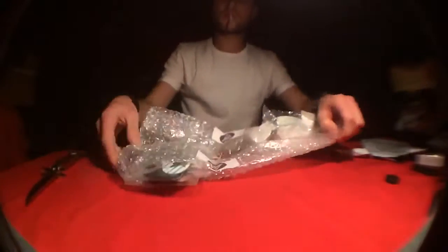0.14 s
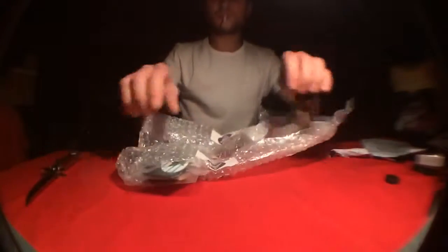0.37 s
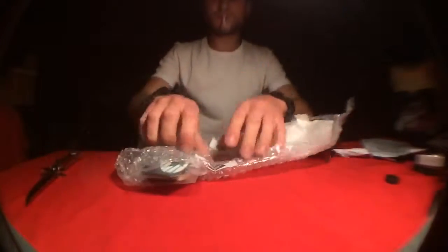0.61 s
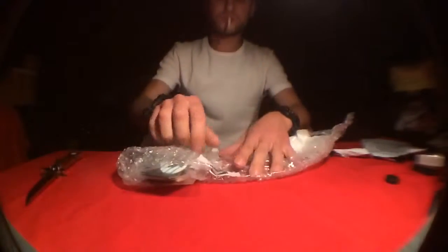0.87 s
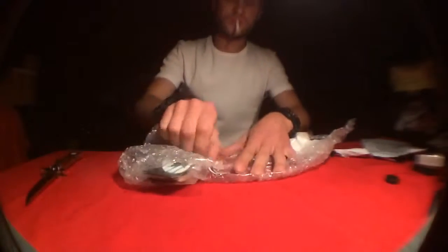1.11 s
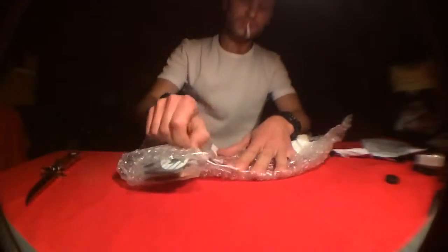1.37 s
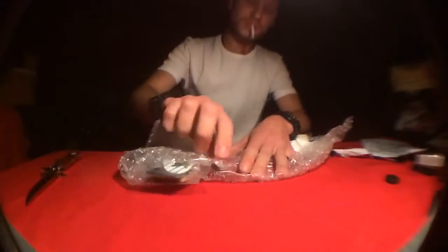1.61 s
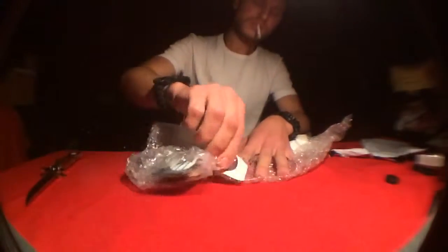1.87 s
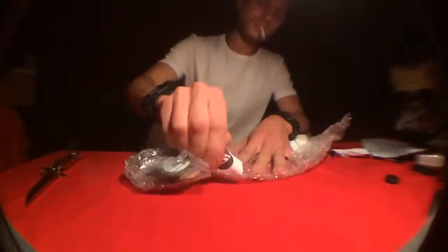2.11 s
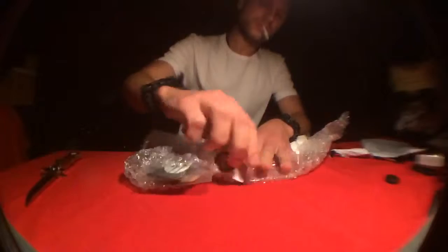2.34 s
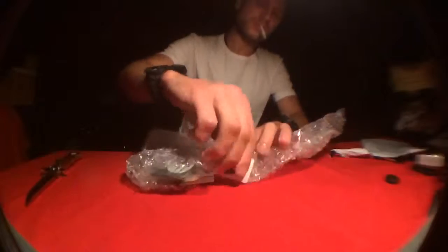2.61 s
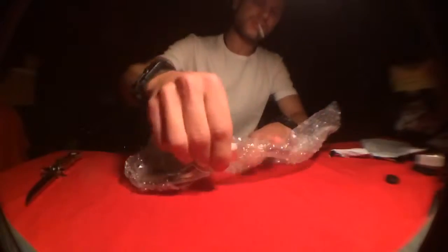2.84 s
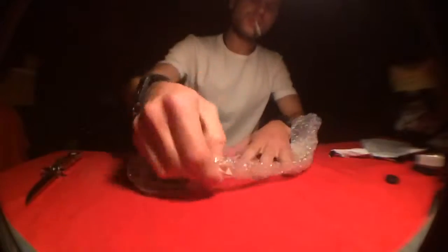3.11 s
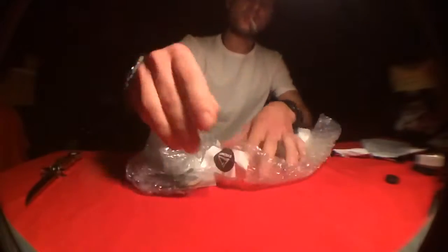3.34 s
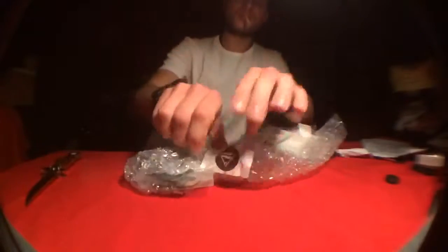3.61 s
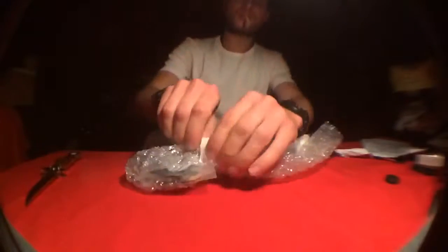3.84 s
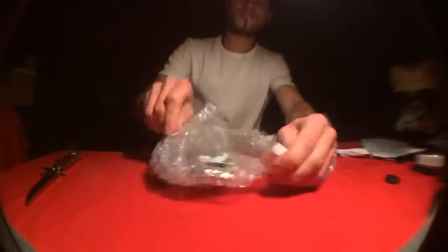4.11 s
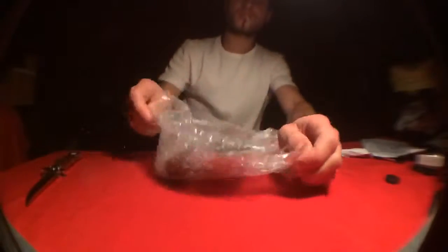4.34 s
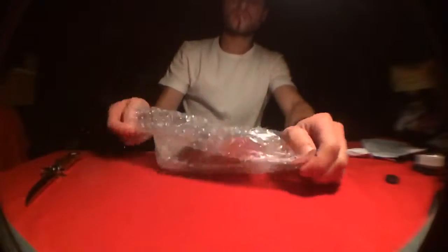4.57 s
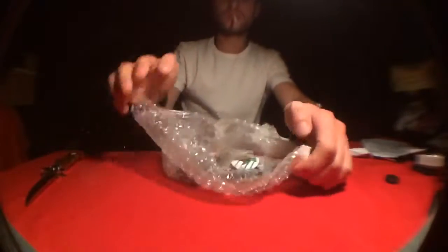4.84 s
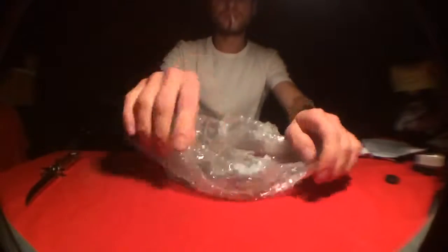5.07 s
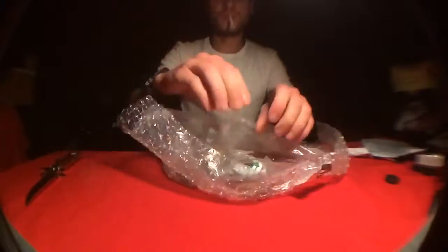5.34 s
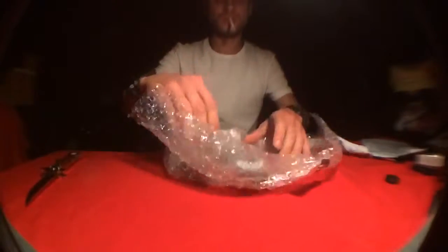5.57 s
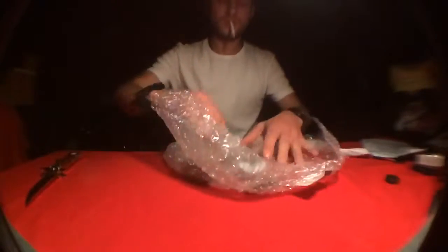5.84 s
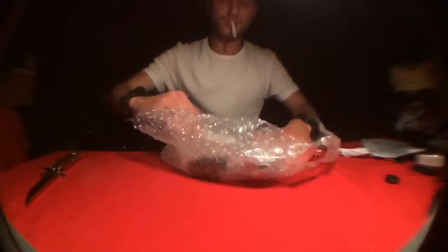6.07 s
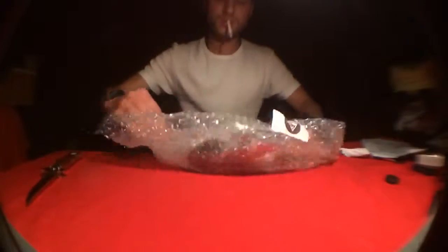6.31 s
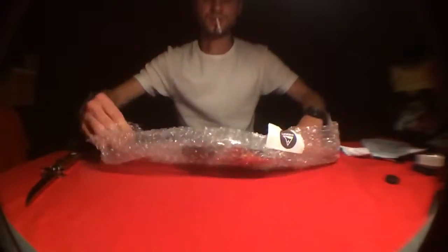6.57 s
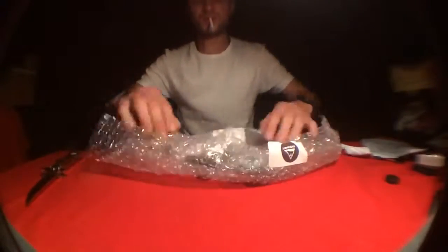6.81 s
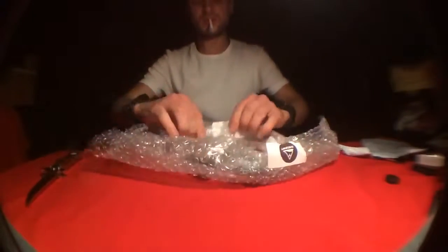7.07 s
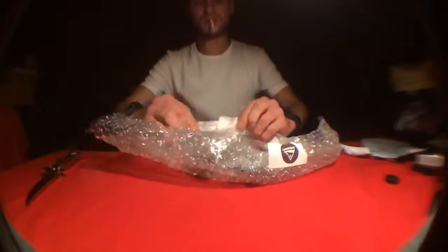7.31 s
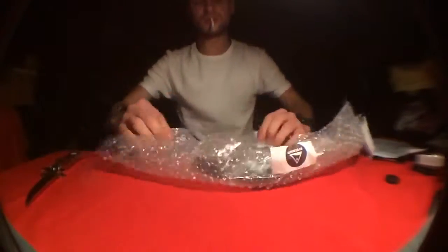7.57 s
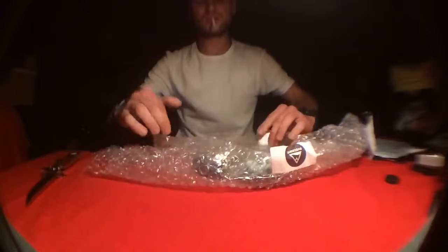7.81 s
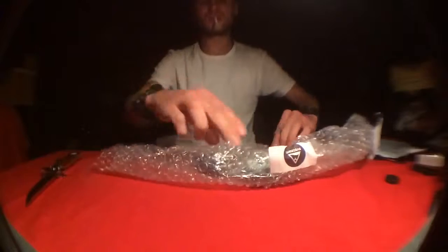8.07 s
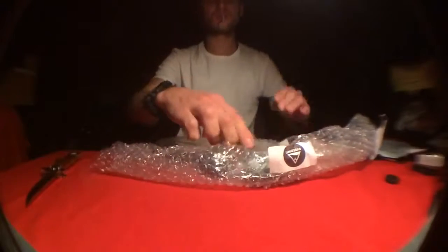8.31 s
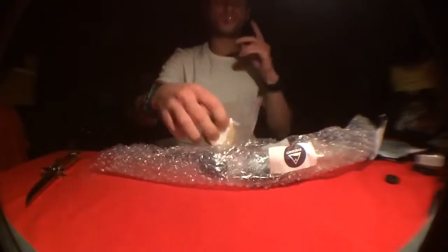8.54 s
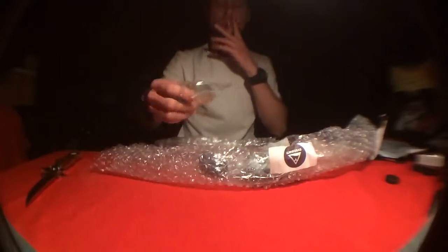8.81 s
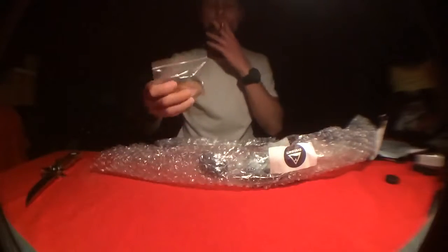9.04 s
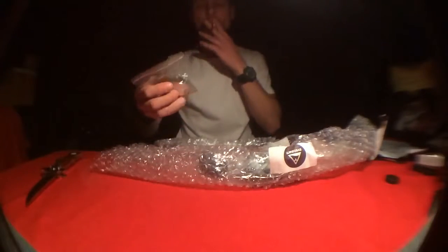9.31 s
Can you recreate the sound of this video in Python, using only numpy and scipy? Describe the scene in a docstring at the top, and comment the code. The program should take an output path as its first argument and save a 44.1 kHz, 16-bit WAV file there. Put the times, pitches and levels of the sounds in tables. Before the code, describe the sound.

Bubble wrap crinkles and snaps in uneven bursts as hands unwrap a parcel on a table, with dull knocks and faint low hum.

```python
"""Hands unwrap a parcel of bubble wrap on a table, close to a small camera on the same table.
The film crinkles and buckles: dense random clicks, single snaps with short panel rings, bare treble ticks.
The parcel drums as low filtered clicks and knocks as decaying table modes, with a short diffuse echo.
A quiet room adds shaped noise, a resonant low rumble and a motor's harmonic hum.
The camera's case colours the film sounds: strong below 2.5 kHz, a dip at 5 kHz, a bump at 6-9 kHz."""
import sys
import numpy as np
from scipy import signal
from scipy.fft import rfft, irfft
from scipy.io import wavfile
from scipy.ndimage import uniform_filter1d

SR = 44100
rng = np.random.default_rng(int(sys.argv[2]) if len(sys.argv) > 2 else 0)


def generate_wav(sig):
    """Save sig (samples, or channels by samples) to the path in sys.argv[1] as 16-bit PCM at SR."""
    pcm = np.round(np.clip(np.atleast_2d(sig).T, -1, 1) * 32767).astype(np.int16)
    wavfile.write(sys.argv[1], SR, pcm)


def convert_level_to_amplitude(level_db):
    """Map a level in decibels to its linear amplitude factor."""
    exponent = np.asarray(level_db, float) / 20
    return 10 ** exponent


N = 415422  # length [samples]


def level(x, db):
    """Root-mean-square normalisation: scale a signal to an rms level."""
    return x * convert_level_to_amplitude(db) / np.sqrt(np.mean(x ** 2))


def shape(points, hz):
    """Spectral envelope: gain in dB interpolated along log frequency."""
    p = np.array(points)
    return np.interp(np.log(hz + 1), np.log(p[:, 0]), p[:, 1])


def band(x, lo_hz, hi_hz):
    """Band-pass filtering: a Butterworth filter keeps one frequency range."""
    return signal.sosfilt(signal.butter(2, [lo_hz, hi_hz], "band", fs=SR, output="sos"), x)


def resonance(hz, centre_hz, width_hz):
    """Resonance curve: a Lorentzian of unit height."""
    return 1 / (1 + (2 * (hz - centre_hz) / width_hz) ** 2)


def wander(step_s):
    """Slow random modulation: held random values smoothed by a moving average."""
    k = max(int(step_s * SR), 2)
    held = np.repeat(rng.standard_normal(N // k + 1), k)
    return uniform_filter1d(held, k)[:N]


def add(out, s, sound, db):
    """Superposition: mix in a short sound with its peak at the given time and level."""
    top = np.argmax(np.abs(sound))
    i = int(s * SR) - top
    piece = sound[:N - i]
    out[i:i + len(piece)] += piece * convert_level_to_amplitude(db) / abs(sound[top])


def rings(hz):
    """Modal resonance: narrow peaks and a dip of the case, in dB."""
    # resonances of the camera case: (frequency [Hz], width [Hz], gain [dB])
    case_modes = [(1370, 100, 5.5), (2160, 217, 10.5), (11980, 240, -15), (13540, 510, 8), (15180, 780, 8)]
    return sum(db * resonance(hz, f, width) for f, width, db in case_modes)


def case(size=4096):
    """Minimum phase: folding the cepstrum of the case's log gain gives its causal response."""
    # broad response of the camera case: (frequency [Hz], gain [dB])
    case_gain = [(35, -41), (60, 10), (170, -2.5), (350, -2), (486, -13.5), (700, -6.5), (1350, -9.5),
                 (1750, -13.5), (2500, -16), (4400, -31), (5300, -29), (6300, -18), (8300, -22),
                 (9600, -30.5), (15500, -42)]
    hz = np.fft.rfftfreq(size, 1 / SR)
    log_gain = (shape(case_gain, hz) + rings(hz)) * np.log(10) / 20
    cepstrum = irfft(log_gain)
    cepstrum[1:size // 2] *= 2
    cepstrum[size // 2 + 1:] = 0
    return irfft(np.exp(rfft(cepstrum)))[:size // 2]


def hands():
    """Envelope summation: moves swell, hold and relax, adding in power; crinkle, fizz and drumming in dB."""
    # grips, pulls and presses: (start [s], length [s], crinkle [dB], fizz [dB], drumming [dB])
    moves = [(0.0, 0.045, -56, -67.5, -57), (0.076, .16, -62.5, -71, -61), (.3, 0.35, -81, -94, -64),
             (0.602, 0.24, -57.5, -68.5, -55.5), (0.894, 0.19, -65, -75.5, -61.5),
             (1.129, .14, -61.5, -71, -57.5), (1.312, 0.021, -56, -70, -67), (1.406, 0.35, -65.5, -75, -61),
             (1.663, 0.036, -61, -76, -56), (1.807, 0.038, -53.5, -63.5, -60.5),
             (1.909, 0.15, -59.5, -69.5, -57), (2.126, 0.026, -58, -67, -52),
             (2.213, 0.049, -59.5, -70, -57), (2.311, 0.04, -55, -63, -53.5),
             (2.404, .18, -63.5, -73.5, -64), (2.465, 0.013, -62, -70, -57),
             (2.606, 0.19, -56.5, -68, -52.5), (2.859, 0.095, -53.5, -63.5, -44),
             (3.028, 0.041, -54.5, -66, -44.5), (3.123, 0.15, -58, -68.5, -53.5),
             (3.334, 0.073, -61, -71, -56.5), (3.47, 0.3, -73, -90, -64.5), (3.74, .07, -60.5, -75, -54.5),
             (3.819, .05, -58, -71, -57), (3.913, 0.075, -56.5, -68, -59),
             (4.043, 0.092, -46.5, -59, -44.5), (4.286, 0.29, -55.5, -67, -51.5),
             (4.385, 0.072, -53, -64.5, -48), (4.595, 0.017, -52, -64, -46),
             (4.711, 0.026, -54.5, -66.5, -51), (4.795, 0.07, -60.5, -70, -59),
             (4.9, 0.13, -68.5, -77, -62.5), (5.08, 0.035, -56, -70.5, -54),
             (5.393, 0.22, -60, -70.5, -56.5), (5.652, 0.13, -63.5, -73.5, -57),
             (5.849, 0.27, -55.5, -68, -52.5), (6.119, 0.017, -49.5, -70, -45.5),
             (6.198, 0.21, -53.5, -64.5, -47.5), (6.499, 0.082, -56.5, -66.5, -49.5),
             (6.678, 0.096, -57, -68, -52.5), (7.037, 0.056, -63, -73.5, -56),
             (7.137, 0.031, -63, -74, -54.5), (7.198, 0.11, -65.5, -75, -75), (7.392, .04, -57, -62.5, -47),
             (7.437, 0.012, -41.5, -57, -38), (7.477, 0.1, -58, -70.5, -52.5),
             (7.667, .14, -69, -79.5, -62), (7.886, 0.024, -60, -71.5, -54.5),
             (7.976, 0.2, -65, -76.5, -59), (8.244, 0.065, -70.5, -78, -59),
             (8.367, 0.22, -72.5, -86, -60.5), (8.6, 0.12, -83, -78.5, -65), (8.993, .1, -77, -81, -68),
             (9.36, 0.016, -71.5, -79, -63.5)]
    grip_db_per_s, relax_db_per_s = 379, 215
    settle_db = (-75.5, -83.5, -70.5)  # the film creeps on its own between moves
    t = np.arange(0, N + 64, 64) / SR
    start, length, *move_db = np.array(moves).T[:, :, None]
    before_s = np.maximum(start - t, 0)
    after_s = np.maximum(t - start - length, 0)
    off = grip_db_per_s * before_s + relax_db_per_s * after_s
    curves = []
    for db, rest_db in zip(move_db, settle_db):
        power = np.sum(convert_level_to_amplitude(db - off) ** 2, axis=0) + convert_level_to_amplitude(rest_db) ** 2
        curves.append(np.interp(np.arange(N) / SR, t, 10 * np.log10(power)))
    return curves


def crackle(per_s, spread_db, cluster_db, cluster_s):
    """Crackling noise: random clicks of very uneven size, bunched as a fold gives way."""
    hit = rng.random(N) < per_s / SR
    size_db = spread_db * np.minimum(rng.exponential(size=N), 4.5)
    size = convert_level_to_amplitude(size_db) * rng.standard_normal(N)
    return hit * size * convert_level_to_amplitude(cluster_db * wander(cluster_s))


def rustle(colour, crinkle_db, fizz_db, drum_db):
    """Shot noise in bands: folds crinkle, the smallest creases fizz, the weight drums on the table."""
    sheet = crackle(1400, 1.34, 3.8, .015)
    # wide, middling and narrow folds each click in their own range, on top of what the whole sheet does
    folds = np.zeros(N)
    for per_s, lo_hz, hi_hz in [(495.4, 390, 1154), (900, 1110, 2110), (1500, 1830, 5200)]:
        own = level(crackle(per_s, 1.17, 1.3, .01), -0.91)
        folds += band(level(sheet, 0) + own, lo_hz, hi_hz)
    creases = band(level(sheet, 0) + level(crackle(5000, 1.5, 2.0, 0.0057), 3.2), 4900, 15000)
    weight = band(level(sheet, -7) + level(crackle(900, 1.5, 3.1, .03), 0), 97, 514)
    out = np.zeros(N)
    for x, curve_db, trim_db in [(folds, crinkle_db, -.6), (creases, fizz_db, -.4), (weight, drum_db, -2.5)]:
        coloured = signal.fftconvolve(x, colour)[:N]
        out += convert_level_to_amplitude(curve_db) * level(coloured, trim_db)
    return out


def room_tone():
    """Filtered noise: room air coloured by the case, with circuit hiss at the top."""
    # spectrum of the room tone: (frequency [Hz], relative density [dB])
    tone_shape = [(25, -14), (60, -4.5), (110, -2.5), (290, -14.5), (480, -18.5), (900, -30.5), (1700, -38),
                  (3500, -37), (5000, -38.5), (7000, -38.5), (10000, -40.5), (15500, -46)]
    hz = np.fft.rfftfreq(N, 1 / SR)
    through_case = np.exp(-(hz / 5000) ** 2)  # the hiss does not pass through the case
    faint_ring_db = 6.8 * resonance(hz, 1200, 120)
    gain_db = shape(tone_shape, hz) + through_case * rings(hz) + faint_ring_db
    return level(irfft(rfft(rng.standard_normal(N)) * convert_level_to_amplitude(gain_db), N), -62)


def rumble():
    """Resonance driven by noise: two low bands of random vibration."""
    # resonances of the rumble: (frequency [Hz], width [Hz], relative level [dB])
    rumble_modes = [(68.8, 14.6, -8.5), (45.6, 36, -10)]
    return sum(level(band(rng.standard_normal(N), f - width / 2, f + width / 2), db)
               for f, width, db in rumble_modes)


def motor_hum():
    """Harmonic series: a distant motor's partials share one slightly wavering pitch."""
    # partials of the hum: (multiple of the fundamental [1], level before the opening boost [dB])
    partials = [(1, -63.5), (2, -71), (3, -79)]
    drift = level(band(rng.standard_normal(N), 0.26, 2.7), -45.5)
    phase = 2 * np.pi * np.cumsum(73.55 * (1 + drift)) / SR  # mean fundamental in Hz
    return sum(level(np.sin(k * phase), db) for k, db in partials)


def room(drum_db):
    """Amplitude modulation: rumble swells and follows the drumming; rumble and hum start loud and subside."""
    rumble_db, swell_db, swell_s = -57, 5.5, 0.16
    shake_db = -23  # share of the table's drumming that reaches the rumble
    opening_db = -44.5 - 26 * np.arange(N) / SR  # falls by 26 dB per second
    rumble_gain = convert_level_to_amplitude(rumble_db + swell_db * wander(swell_s)) + convert_level_to_amplitude(opening_db) + convert_level_to_amplitude(drum_db + shake_db)
    hum_gain = 1 + convert_level_to_amplitude(opening_db - rumble_db - 10.5)
    return room_tone() + rumble_gain * rumble() + hum_gain * motor_hum()


def echo(x):
    """Reverberation: exponentially decaying noise, faded in, as the tail of a small furnished room."""
    t60_s, echo_db, rise_s = 0.13, -13.5, 0.013
    t = np.arange(int(.4 * SR)) / SR
    decay = np.exp(-np.log(1000) * t / t60_s)
    tail = rng.standard_normal(len(t)) * decay * np.clip(t / rise_s, 0, 1)
    return x + convert_level_to_amplitude(echo_db) * signal.fftconvolve(x, tail / np.sqrt(np.sum(tail ** 2)))[:N]


def lesser(crinkle_db, over_db, count):
    """Random events scaled by activity: rows (time [s], peak [dB], random size 0-1)."""
    spread_db = 4
    when, size, scatter = rng.random((count, 3)).T
    i = (200 + when * (N - 400)).astype(int)
    return list(zip(i / SR, crinkle_db[i] + over_db + spread_db * (2 * scatter - 1), size))


def stutter(sound):
    """Stick-slip: a first slip, then a random spray of mostly weaker ones that dies away."""
    t = np.arange(512) / SR
    struck = rng.random(512) < .03
    slips = convert_level_to_amplitude(-9) * struck * rng.standard_normal(512) * np.exp(-t / 0.0038)
    slips[0] = 1
    return signal.fftconvolve(sound, slips)


def ticks(colour, crinkle_db):
    """Impulse response: small creases excite only a brief treble click of the case."""
    # bright ticks of small creases: (time [s], peak [dB])
    crease_ticks = [(.4571, -60), (.9728, -55), (1.4332, -53), (1.5339, -50), (1.9015, -54), (1.9097, -55),
                    (1.9622, -52), (2.0365, -48), (2.6411, -48), (2.6656, -48), (2.9177, -46),
                    (3.0526, -45), (3.3793, -48.5), (4.0585, -33), (4.0668, -28), (4.2148, -51),
                    (4.7127, -42), (4.7462, -40), (6.129, -44), (6.1507, -44), (6.1867, -47), (6.3828, -45),
                    (6.39, -43), (6.403, -45), (7.1891, -47), (7.3793, -44), (7.439, -39), (8.6036, -53),
                    (8.7325, -54), (9.0021, -56), (9.1068, -54), (9.3724, -53)]
    out, t = np.zeros(N), np.arange(2048) / SR
    tick = band(colour, 5800, 13300) * np.exp(-t / 0.0035)
    for s, db, *_ in crease_ticks + lesser(crinkle_db, -0.5, count=40):
        add(out, s, stutter(tick), db)
    return out


def snaps(colour, crinkle_db):
    """Buckling: each snap is a click with a damped panel ring, both duller for wide panels."""
    # single loud buckles: (time [s], peak [dB], ring [Hz], ring decay by 60 dB [s])
    buckles = [(.7763, -51, 1220, 0.0076), (1.0719, -45.5, 1370, 0.011), (1.228, -38, 1210, 0.012),
               (1.2526, -33, 610, 0.018), (1.3124, -26.5, 1010, 0.029), (1.5337, -45.5, 1360, .006),
               (1.572, -46, 1300, .005), (1.9384, -46, 1240, .006), (2.1552, -43.5, 730, 0.025),
               (2.395, -42.5, 850, .008), (2.4831, -39.5, 550, .012), (2.5753, -42.5, 830, 0.018),
               (2.6653, -33, 2160, 0.0063), (2.685, -38, 1280, .007), (2.6963, -21, 730, 0.014),
               (2.755, -37.5, 540, 0.015), (2.8656, -35, 646, 0.017), (2.911, -32.5, 550, 0.019),
               (2.9219, -35.5, 2200, 0.015), (3.0359, -33.5, 550, .007), (3.152, -53, 2200, .004),
               (3.217, -44, 1500, 0.0077), (3.399, -41, 550, 0.0079), (3.8392, -38.5, 2170, 0.0031),
               (3.945, -37, 1380, 0.0092), (3.954, -37, 1390, 0.01), (3.9784, -38.5, 1440, 0.0083),
               (4.0353, -28.5, 880, 0.016), (4.0453, -34, 1250, 0.012), (4.0596, -35, 1440, 0.012),
               (4.069, -24, 690, 0.0065), (4.089, -29.5, 1330, 0.0057), (4.1363, -36, 550, 0.015),
               (4.4367, -40, 2210, 0.0059), (4.4972, -37, 635, 0.017), (4.6061, -34.5, 1280, 0.012),
               (4.713, -39, 1170, 0.012), (4.8388, -38.5, 1400, 0.0034), (5.096, -42, 550, 0.013),
               (5.7637, -43, 746, 0.0082), (6.1267, -25.5, 1290, .0037), (6.186, -34, 1000, 0.023),
               (6.3311, -28, 835, 0.013), (6.3415, -33.5, 740, 0.022), (6.383, -35.5, 730, 0.024),
               (6.4189, -34, 2250, 0.0079), (6.4279, -35, 1220, .007), (6.4991, -35, 774, .012),
               (6.5325, -36, 700, 0.04), (6.5488, -41, 760, .02), (6.7148, -37, 587, 0.023),
               (7.0262, -45.5, 890, 0.016), (7.372, -39, 624, 0.023), (7.3792, -31, 550, 0.033),
               (7.392, -29, 736, .009), (7.44, -29, 554, 0.0099), (7.4475, -23, 860, 0.023),
               (7.9018, -44, 1460, 0.012), (8.0801, -45, 1420, .007), (8.279, -49, 1000, .008),
               (8.3905, -44, 736, 0.0096), (8.68, -55, 900, .008), (8.974, -53, 800, 0.0088)]
    lo_hz, hi_hz, cycles = 550, 2200, 12.7  # rings of the lesser buckles; cycles per 60 dB decay
    out, t = np.zeros(N), np.arange(2048) / SR
    click = band(colour, 350, 3600)
    small = []
    for s, db, size in lesser(crinkle_db, 9, count=60):
        panel_hz = lo_hz * (hi_hz / lo_hz) ** size
        small.append((s, db, panel_hz, cycles / panel_hz))
    for s, db, hz, t60_s in buckles + small:
        ring = np.sin(2 * np.pi * hz * t) * np.exp(-np.log(1000) * t / t60_s)
        slips = stutter(click)[:len(t)] / np.abs(click).max()
        # a panel that rings for many cycles takes its energy from the click
        click_gain = convert_level_to_amplitude(14.0 - 0.77 * hz * t60_s)
        dull = signal.butter(2, 500 + 1.57 * hz, fs=SR, output="sos")
        add(out, s, signal.sosfilt(dull, ring + click_gain * slips), db)
    return out


def knocks():
    """Modal excitation: a soft push rings the table's modes, most those near the favoured frequency."""
    # the parcel meets the table: (time [s], peak [dB], most excited frequency [Hz], decay time factor [1])
    blows = [(1.6955, -48, 244, 0.92), (2.005, -39.5, 304, 1.0), (2.349, -38, 170, .8),
             (2.4826, -31.5, 160, 0.51), (2.58, -39, 192, 0.6), (2.6961, -26.5, 172, 1.0),
             (2.8698, -35, 191, 0.79), (2.9172, -37, 120, 1.0), (3.049, -45, 240, .9),
             (3.2542, -42, 260, .9), (3.3984, -41, 298, 1.1), (3.8246, -43, 150, .9),
             (4.0968, -33, 221, 1.4), (4.3277, -36.5, 360, 1.2), (4.42, -33.5, 323, 0.59),
             (4.4616, -35, 149, 1.4), (4.611, -42, 140, 1.0), (4.7854, -40, 139, 0.74),
             (4.8452, -41, 160, 1.0), (5.0977, -43, 220, 0.9), (5.511, -46, 130, 0.91),
             (5.9963, -38, 160, 1.3), (6.1292, -33, 310, 2.3), (6.139, -30, 151, .9),
             (6.1887, -29.5, 222, 0.68), (6.28, -35, 151, 0.72), (6.3017, -40, 270, 1.0),
             (6.364, -37, 160, 1.0), (6.507, -27, 127.5, 2.2), (6.5255, -46, 130, 1.2),
             (6.749, -43, 190, 1.0), (7.1687, -48, 318, .9), (7.379, -30, 397, 0.93),
             (7.4446, -19.5, 130, 1.1), (7.455, -25.5, 150, 1.3), (7.5073, -34, 140, 1.0),
             (8.1387, -28, 194, 3.2), (8.1541, -34.5, 250, 2.9), (9.38, -47, 364, 2.6)]
    # modes of the table top: (frequency [Hz], relative level [dB], decay by 60 dB before the factor [s])
    table_modes = [(85, -27, 0.046), (124, -11.5, 0.072), (141, -13, 0.11), (167, -2.5, 0.06),
                   (201, 4, 0.023), (253.4, 5.5, 0.038), (310, 2, 0.04), (355, 10, 0.056), (413, 3, 0.18)]
    out, t = np.zeros(N), np.arange(8192) / SR
    push = np.exp(-.5 * ((t[:256] - .003) / 0.00025) ** 2)
    for s, db, hz, stretch in blows:
        ring = np.zeros(len(t))
        for f, mode_db, t60_s in table_modes:
            gain = convert_level_to_amplitude(mode_db - 27.5 * abs(np.log2(f / hz)))  # weaker by 27.5 dB per octave away
            ring += gain * np.sin(2 * np.pi * f * t) * np.exp(-np.log(1000) * t / (t60_s * stretch))
        add(out, s, signal.fftconvolve(ring, push), db)
    return out


def scene():
    """Superposition: film and table sounds with their echo, plus the room."""
    colour = case()
    crinkle_db, fizz_db, drum_db = hands()
    film = rustle(colour, crinkle_db, fizz_db, drum_db)
    film += ticks(colour, crinkle_db) + snaps(colour, crinkle_db)
    return (echo(film + knocks()) + room(drum_db))[None]


def band_limit(x):
    """A steep low-pass at the top of the band."""
    return signal.sosfilt(signal.butter(12, 15680, fs=SR, output="sos"), x)


def record(dry):
    """Band limiting: the camera cuts the deepest bass and the top."""
    low_cut_hz, top_hz = 38.5, 15500
    x = signal.sosfilt(signal.butter(5, low_cut_hz, "high", fs=SR, output="sos"), dry)
    x = signal.sosfilt(signal.ellip(8, .2, 50, top_hz, fs=SR, output="sos"), x)
    return band_limit(x)


dry = scene()
out = record(dry)
generate_wav(out)
```